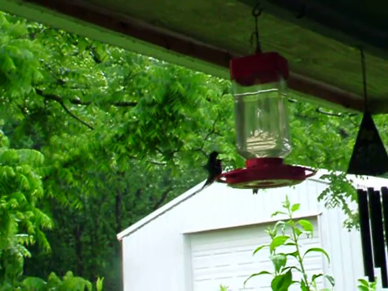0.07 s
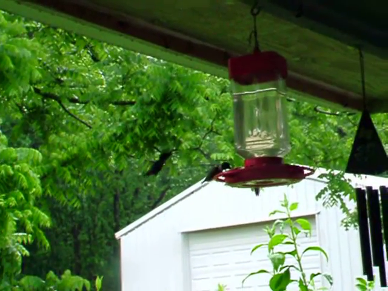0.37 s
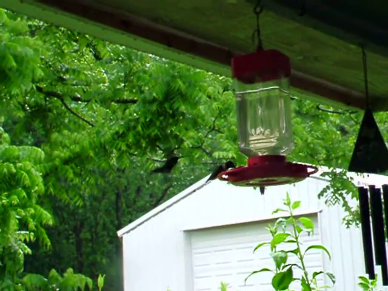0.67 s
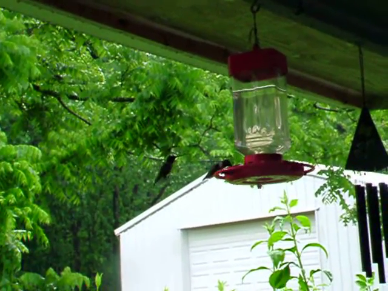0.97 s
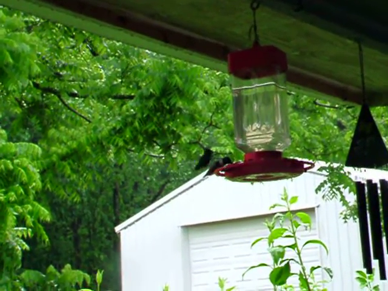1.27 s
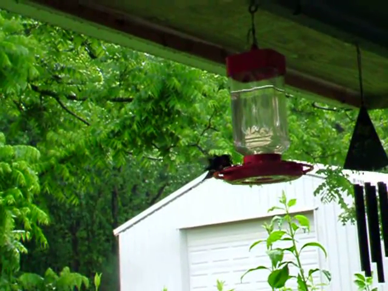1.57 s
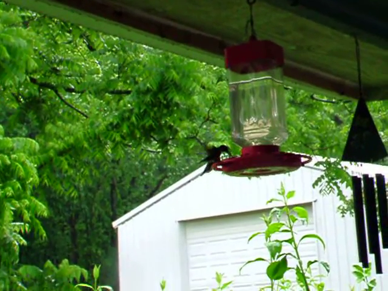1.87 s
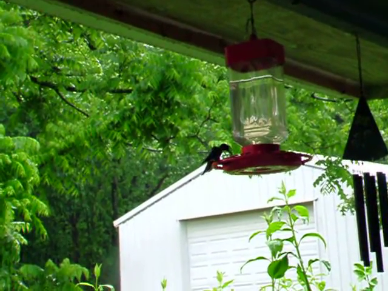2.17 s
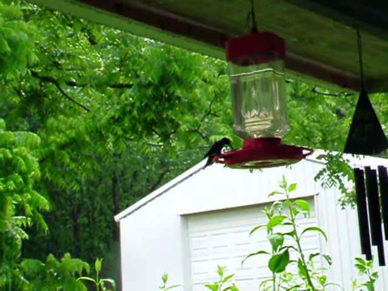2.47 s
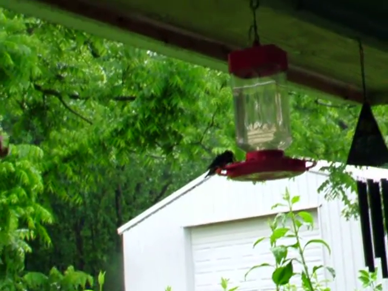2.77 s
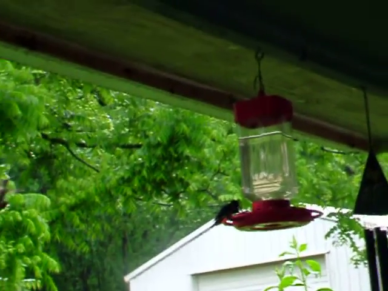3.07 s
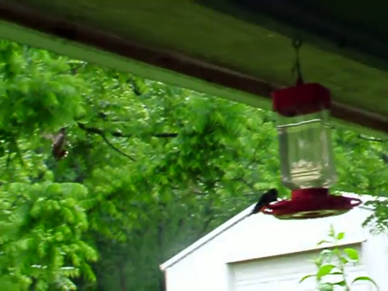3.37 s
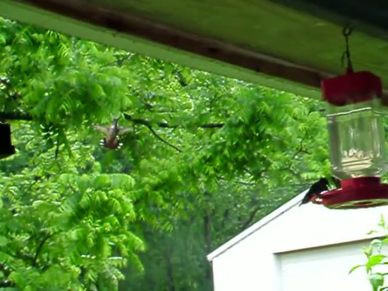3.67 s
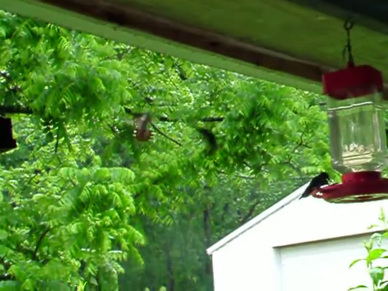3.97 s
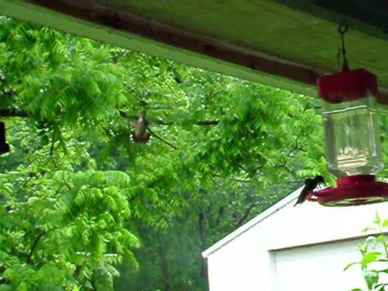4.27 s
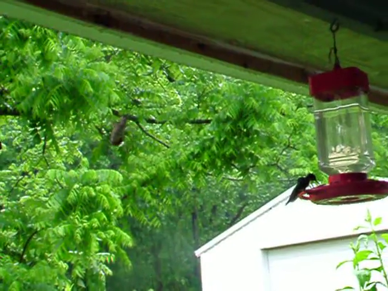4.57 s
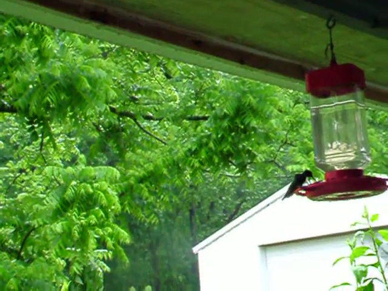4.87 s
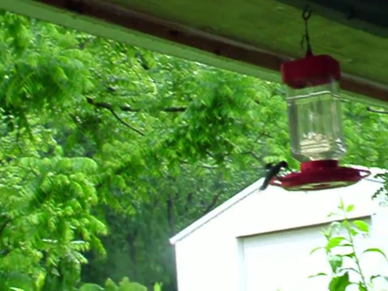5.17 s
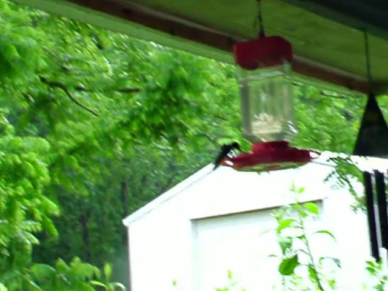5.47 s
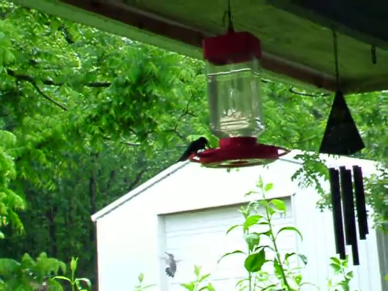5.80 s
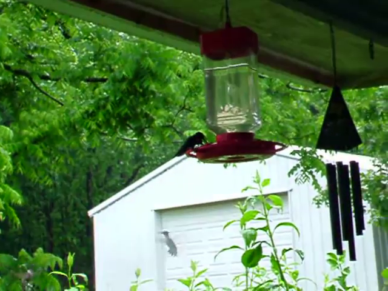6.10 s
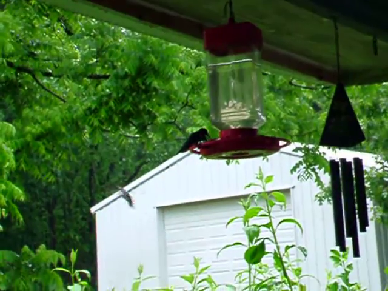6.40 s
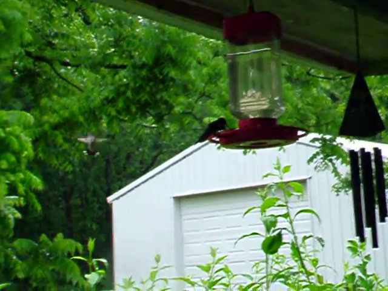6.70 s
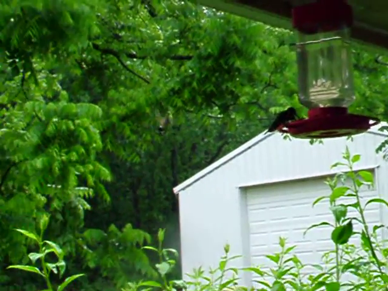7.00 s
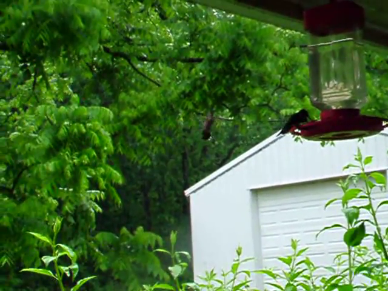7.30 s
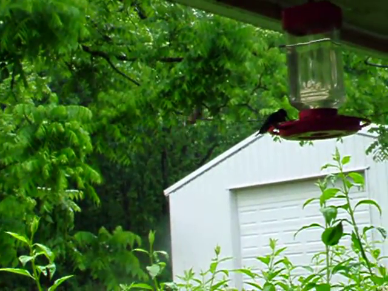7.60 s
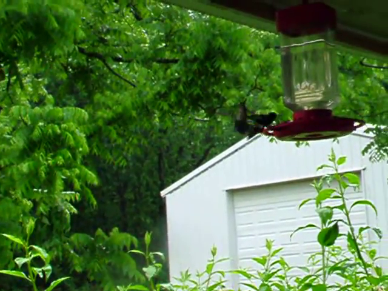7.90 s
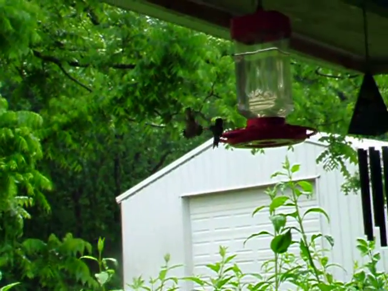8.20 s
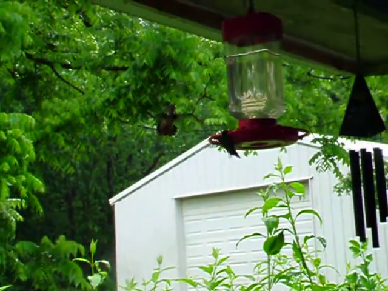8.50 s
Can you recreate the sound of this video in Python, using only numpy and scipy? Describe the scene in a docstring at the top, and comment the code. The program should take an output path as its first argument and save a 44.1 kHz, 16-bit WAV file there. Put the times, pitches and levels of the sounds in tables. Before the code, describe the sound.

Steady soft rain and occasional drips, with a brief burst of hummingbird chittering and a far bird repeating two notes.

```python
"""A porch feeder in steady light rain. Far drops merge into hiss; near drips smack and spray.
Out in the wet trees a songbird repeats a two-note phrase, scattered by trunks and leaves.
Hummingbirds squabble in peeps, rasps, whistles, falling chips and buzzes: gliding sines roughened
by noise, over a faint hum of wingbeats. Roof and walls echo their calls and the drips.
One microphone, mono, with a dull top."""
import sys
import numpy as np
from scipy import signal
from scipy.fft import rfft, irfft
from scipy.io import wavfile

SR = 44100
rng = np.random.default_rng(int(sys.argv[2]) if len(sys.argv) > 2 else 0)


def log_audio(samples):
    """Write samples as a 16-bit WAV file to the path given in sys.argv[1]."""
    # one column per channel
    frames = np.atleast_2d(samples).T
    # limit to full scale, then quantise
    limited = np.clip(frames, -1, 1)
    pcm = np.round(limited * 32767).astype(np.int16)
    wavfile.write(sys.argv[1], SR, pcm)


N = 381465
TIME_S = np.arange(N) / SR


def undb(db):
    """Decibels to gain."""
    return 10 ** (np.asarray(db) / 20)


def unit(x):
    """Scale to rms 1."""
    return x / np.sqrt(np.mean(x ** 2))


def add(track, start_s, sound):
    """Mix a sound into the track, in place."""
    i = int(start_s * SR)
    track[i:i + len(sound)] += sound[:N - i]


def wander(n, rate_hz):
    """Random drift, rms 1, with rate_hz knots a second."""
    knots = rng.standard_normal(int(n * rate_hz / SR) + 3)
    return unit(np.interp(np.arange(n) * rate_hz / SR, np.arange(len(knots)), knots))


def colour(x, points):
    """Filter by a curve of (Hz, dB) points."""
    hz, db = np.transpose(points)
    bins_hz = np.maximum(np.fft.rfftfreq(N, 1 / SR), 1)
    return irfft(rfft(x) * undb(np.interp(np.log(bins_hz), np.log(hz), db)), N)


def resonate(x, hz, q):
    """One broad resonance."""
    return signal.lfilter(*signal.iirpeak(min(hz, SR / 3), max(q, .5), fs=SR), x)


def reverb(x, t60_s):
    """Diffuse scatter: a decaying noise tail of unit energy."""
    tail = rng.standard_normal(SR) * np.exp(-np.log(1000) * TIME_S[:SR] / t60_s)
    return signal.fftconvolve(x, tail / np.linalg.norm(tail))[:N]


def rain(level_db=-34.5, patter_db=-11, size_spread_db=4, swell_db=.03, hits_per_s=90):
    """Far drops merge into hiss; nearer ones patter on leaves, each leaf at its own pitch."""
    # Each row: frequency in Hz, relative spectral density in dB.
    hiss_spectrum = [(15, -30.5), (28, -13), (54, -4), (170, -6.5), (245, -1.5), (480, -3), (660, -0.4),
                     (850, -1.77), (1400, -0.3), (2100, -0.84), (2700, -2.5), (5100, -3), (7000, -3),
                     (10000, -15.5)]
    hiss = unit(colour(rng.standard_normal(N), hiss_spectrum))
    patter = np.zeros(N)
    for leaf_hz in np.geomspace(2500, 7000, 6):
        hits = rng.random(N) < hits_per_s / SR
        sizes = undb(size_spread_db * np.minimum(rng.exponential(size=N), 3))
        patter += resonate(hits * sizes * rng.choice([-1, 1], N), leaf_hz, q=5)
    return (hiss + undb(patter_db) * unit(patter)) * undb(level_db + swell_db * wander(N, 4.4))


def note(length_s, contour_hz, rasp, edge=.14, droop=0, shake_hz=1000, hiss=.7):
    """Bird note, a gliding sine. Droop sags the pitch with pressure; rasp shakes it and adds hiss."""
    progress = np.linspace(0, 1, int(length_s * SR))
    knots = np.linspace(0, 1, len(contour_hz))
    hz = np.polyval(np.polyfit(knots, contour_hz, len(knots) - 1), progress)
    pressure = np.sin(np.pi / 2 * np.clip(np.minimum(progress, 1 - progress) / edge, 0, 1))
    hz = hz * (1 - droop * (1 - pressure)) + rasp * shake_hz * wander(len(hz), 2200)
    strength = pressure * (1 + .5 * rasp * wander(len(hz), 900))
    air = unit(resonate(rng.standard_normal(len(hz)), .88 * np.mean(contour_hz), q=1.1))
    return strength * np.sin(2 * np.pi * np.cumsum(hz) / SR) + hiss * rasp * pressure * air


def song(opening_s=3.19, repeat_s=3.472, period_s=.2525, peak_s=4.1, fade_db_per_s2=1.3):
    """A lone slur, then nine phrases of low rising lead-in and high falling slur; swells, then eases."""
    slur_hz, lead_in_hz = (3560, 3420, 3157, 2784), (1779, 1931, 2330)
    slur_db, lead_in_db, lead_s = -30.6, -35.5, .056
    out = np.zeros(N)
    phrases_s = repeat_s + period_s * np.arange(9)
    effort_db = lambda s: -fade_db_per_s2 * (s - peak_s) ** 2
    for s in (opening_s, *phrases_s):
        add(out, s, undb(slur_db + effort_db(s)) * note(.06, slur_hz, rasp=.19, edge=.073))
    for s in phrases_s:
        add(out, s - lead_s, undb(lead_in_db + effort_db(s)) * note(.046, lead_in_hz, rasp=.1, edge=.2))
    return out


def songbirds(direct_db=-6, scatter_db=-4, woods_db=-3, near_wall_s=.03, far_wall_s=.115):
    """The song and single far calls, arriving largely by way of trunks, leaves and two walls."""
    # Each row: start in seconds, length in seconds, start and end pitch in Hz, source level in dB.
    far_calls = [(1.605, .022, 5050, 5200, -33.5), (2.655, .06, 3290, 2840, -36),
                 (7.87, 0.028, 4200, 3600, -36)]
    source = song()
    for start_s, length_s, start_hz, end_hz, db in far_calls:
        add(source, start_s, undb(db) * note(length_s, (start_hz, end_hz), rasp=.1))
    heard = undb(direct_db) * source + undb(scatter_db) * reverb(source, t60_s=.28)
    heard += undb(woods_db) * reverb(source, t60_s=1.5)
    add(heard, near_wall_s, undb(-8) * source)
    add(heard, far_wall_s, undb(-10) * reverb(source, t60_s=.2))
    return heard


def wing_hum(beat_hz, waver=.035, flutter_db=2.5):
    """Each wingbeat pushes a pulse of air; rate and strength waver as the bird darts about."""
    # Each row: frequency in Hz, relative level of a harmonic there in dB.
    wing_spectrum = [(50, -18), (100, -7), (140, -2.5), (200, -2), (260, -.5), (340, -2.5), (600, -14.5)]
    hz, db = np.transpose(wing_spectrum)
    phase = 2 * np.pi * np.cumsum(beat_hz * (1 + waver * wander(N, 12))) / SR
    beats = np.zeros(N)
    for k in range(1, 9):
        gain = undb(np.interp(k * np.mean(beat_hz), hz, db))
        beats += gain * np.sin(k * phase + rng.uniform(0, 2 * np.pi))
    return unit(beats * undb(flutter_db * wander(N, 8)))


def wings(hover_db=-64, hover_hz=49, slowing=.09):
    """Faint hovering hum; it swells as a bird swoops near and falls in pitch as it brakes."""
    # Each row: nearest moment in seconds, -3 dB half-width in seconds, beat in Hz, peak level in dB.
    swoops = [(3.4, .15, 52, -56), (4.1, 0.2, 45, -52), (5.05, .12, 51, -49.5), (7.2, 0.2, 49, -54),
              (7.7, .2, 53, -50), (8.4, .3, 52, -54)]
    out = undb(hover_db) * wing_hum(hover_hz)
    for nearest_s, width_s, beat_hz, db in swoops:
        along = (TIME_S - nearest_s) / width_s
        distance = np.hypot(1, along)
        out += undb(db) / distance * wing_hum(beat_hz * (1 - slowing * along / distance))
    return out


def smack(hz, db, spray_db=-15, spray_t60_s=.3, q=2.3, contact_s=.0018, t60_cycles=65):
    """A drip flattens on a wet surface, then throws a brief spray."""
    t = TIME_S[:SR // 5]
    impact, spray = rng.standard_normal((2, len(t)))
    ring = np.exp(-np.log(1000) * np.maximum(t - contact_s, 0) * hz / t60_cycles)
    impact = unit(resonate(impact, hz, q)) * ring
    # Cubed noise is spiky: separate droplets landing.
    spray = unit(resonate(spray ** 3, hz, q)) * np.exp(-np.log(1000) * t / spray_t60_s)
    # A small splash radiates little far below its pitch.
    low_cut = signal.butter(2, min(.4 * hz, SR / 4), "high", fs=SR)
    return undb(db) * signal.lfilter(*low_cut, impact + undb(spray_db) * spray)


def drips(light_count=18, light_hz=6400, spread_octaves=.2, light_db=-31, spread_db=1.5):
    """A few drips land close by; lighter ones fall at random throughout."""
    # Each row: start in seconds, impact level in dB, centre frequency in Hz.
    near_drips = [(.3826, -24.5, 5700), (.4119, -20, 2900), (.938, -24, 4700), (1.275, -23, 5900),
                  (2.4423, -22.5, 5000), (2.979, -27, 6440), (4.075, -25.5, 6500), (4.4653, -25.5, 6600),
                  (5.106, -27.5, 5700), (5.133, -24.5, 2940), (5.168, -25, 6000), (7.5117, -28, 5700)]
    out = np.zeros(N)
    for start_s, db, hz in near_drips:
        add(out, start_s, smack(hz, db))
    for k in range(light_count):
        start_s = (k + rng.random()) / light_count * TIME_S[-1]
        pitch, size = rng.standard_normal(2)
        add(out, start_s, smack(light_hz * 2 ** (spread_octaves * pitch), light_db + spread_db * size))
    return out


def hummingbird_notes(peep_arch=.06, rasp_hz=7250, whistle_rise=.035):
    """Clear arched peeps, harsh rasps on one pitch and thin rising whistles."""
    # Each row: start in seconds, length in seconds, top pitch in Hz, level in dB.
    peeps = [(3.111, .009, 6000, -33), (3.176, .023, 6660, -19.5), (3.238, .014, 6630, -22)]
    # Each row: start in seconds, length in seconds, level in dB.
    rasps = [(3.417, .028, -20.5), (3.747, .014, -25.5), (3.805, .032, -22)]
    # Each row: start in seconds, length in seconds, middle pitch in Hz, level in dB.
    whistles = [(3.773, .022, 6750, -28.5), (5.412, .13, 6430, -35.5), (7.729, .048, 6830, -32)]
    out = np.zeros(N)
    for start_s, length_s, hz, db in peeps:
        end_hz = hz * (1 - peep_arch)
        peep = note(length_s, (end_hz, hz, end_hz), rasp=.05, edge=.18, droop=.12)
        add(out, start_s, undb(db) * peep)
    for start_s, length_s, db in rasps:
        rasp = note(length_s, (rasp_hz, rasp_hz), rasp=.66, edge=.22, droop=.05, hiss=.57)
        add(out, start_s, undb(db) * rasp)
    for start_s, length_s, hz, db in whistles:
        rising_hz = (hz * (1 - whistle_rise), hz, hz * (1 + whistle_rise))
        add(out, start_s, undb(db) * note(length_s, rising_hz, rasp=.17, edge=.15, droop=.045))
    return out


def hummingbird_chips(snap_db=-6):
    """Each chip dives in pitch and ends in a noisy snap."""
    # Each row: start in seconds, dive length in seconds, level in dB.
    chips = [(3.5, .014, -20), (3.552, .012, -23), (3.607, .012, -22), (3.661, .013, -21.5)]
    out = np.zeros(N)
    for start_s, length_s, db in chips:
        dive = note(length_s, (8300, 7400, 6000), rasp=.1, edge=.43)
        snap = note(.0072, (8200, 7300, 6300), rasp=.8, edge=.3)
        add(out, start_s, undb(db) * np.concatenate([dive, undb(snap_db) * snap]))
    return out


def hummingbird_buzzes(squeak_db=-.5, pitch_sag=.03):
    """A clear pip and a harsh squeak alternate; the buzz swells fast, then tires and sags."""
    # Each row: start in seconds, length in seconds, start pitch in Hz, pulse rate in Hz, top level in dB.
    buzzes = [(3.2977, .066, 6500, 83, -17.5), (3.889, .05, 6440, 84, -18.3)]
    out = np.zeros(N)
    for start_s, length_s, start_hz, pulse_hz, db in buzzes:
        for t in np.arange(0, length_s, 1 / pulse_hz):
            effort_db = np.interp(t / length_s, (0, .25, 1), (-7, 0, -6))
            hz = start_hz * (1 - pitch_sag * t / length_s)
            pip = note(.53 / pulse_hz, (hz, hz), rasp=.064, edge=.43, droop=.2)
            squeak = note(.43 / pulse_hz, (hz * 1.1, hz * 1.2, hz * 1.2), rasp=.87, edge=.51)
            add(out, start_s + t, undb(db + effort_db) * np.concatenate([pip, undb(squeak_db) * squeak]))
    return out


def porch(x, tail_db=-13, t60_s=.086):
    """Hard reflections off roof and walls, and a short, open-sided tail."""
    # Each row: delay in seconds, gain in dB.
    echoes = [(.0095, -7), (0.0157, -13), (0.024, -12)]
    out = x + undb(tail_db) * reverb(x, t60_s)
    for delay_s, db in echoes:
        add(out, delay_s, undb(db) * x)
    return out


def scene():
    """All sources at one microphone, on two identical channels."""
    background = rain()
    squabble = hummingbird_notes() + hummingbird_chips() + hummingbird_buzzes()
    mono = background + porch(squabble + drips()) + wings() + songbirds()
    return np.array([mono, mono])


def record(dry, cutoff_hz=9000):
    """Microphone treble roll-off, then a steep low-pass."""
    # Each row: frequency in Hz, gain in dB.
    mic_response = [(20, 0.5), (6600, 0), (7300, -3), (8000, -7.5), (8700, -18.5), (9200, -36.5)]
    low_pass = signal.ellip(10, .2, 80, cutoff_hz, fs=SR, output="sos")
    return signal.sosfilt(low_pass, colour(dry, mic_response))


dry = scene()
out = record(dry)
log_audio(out)
```